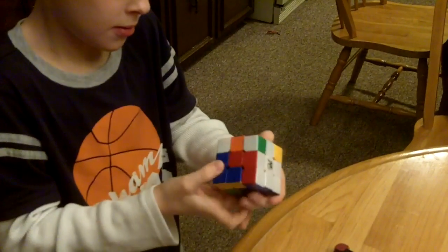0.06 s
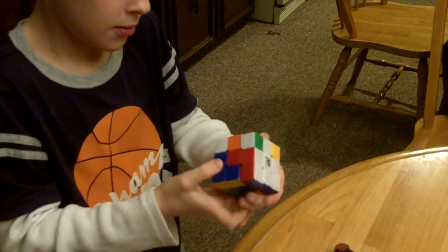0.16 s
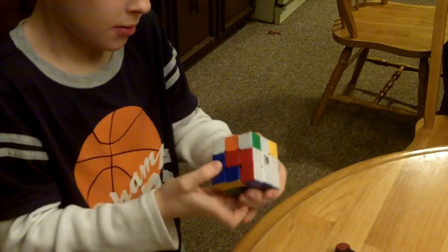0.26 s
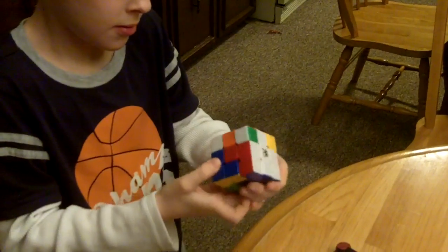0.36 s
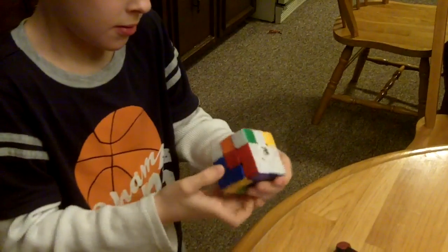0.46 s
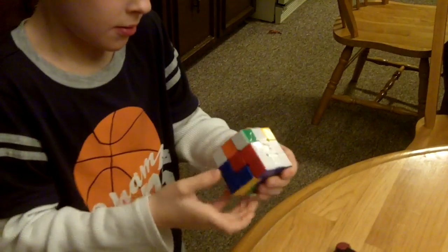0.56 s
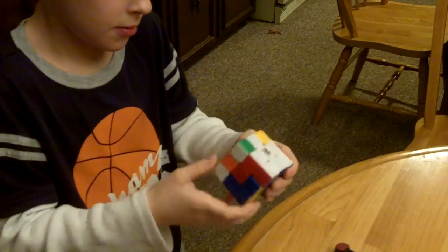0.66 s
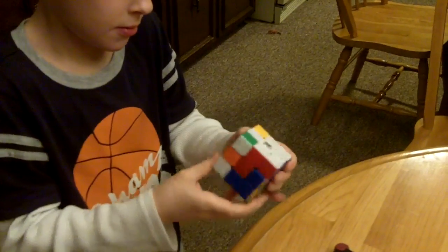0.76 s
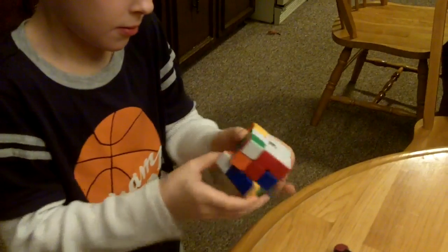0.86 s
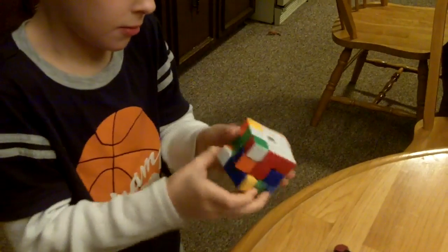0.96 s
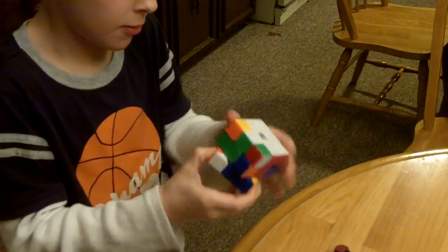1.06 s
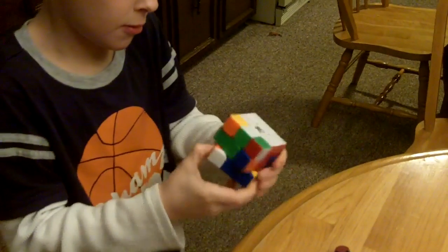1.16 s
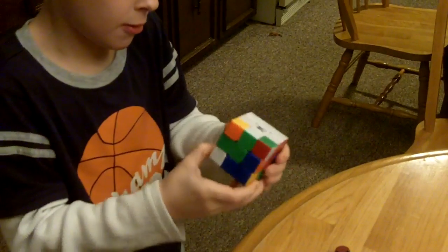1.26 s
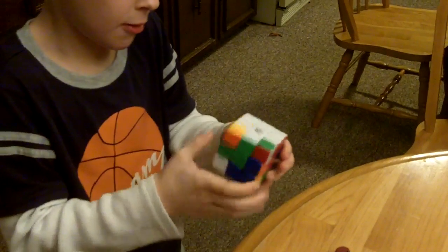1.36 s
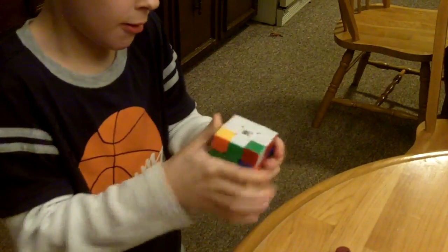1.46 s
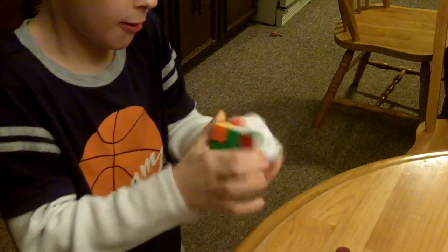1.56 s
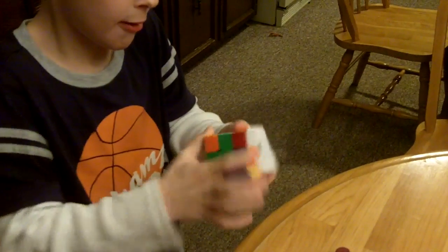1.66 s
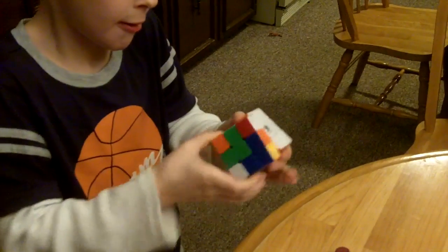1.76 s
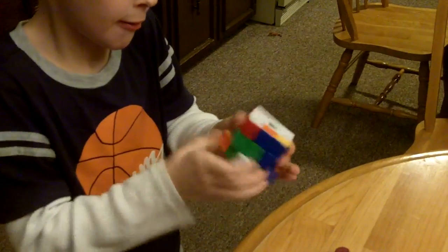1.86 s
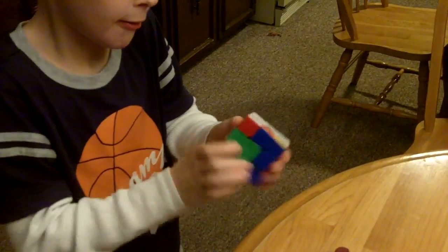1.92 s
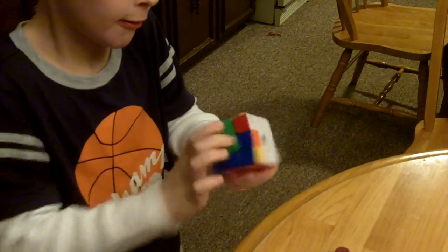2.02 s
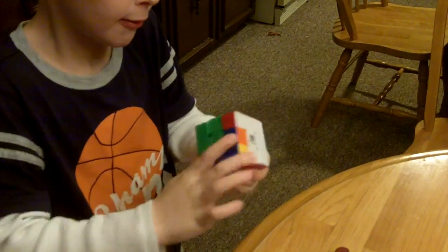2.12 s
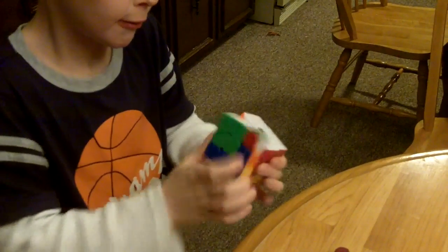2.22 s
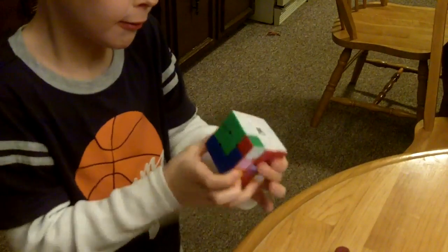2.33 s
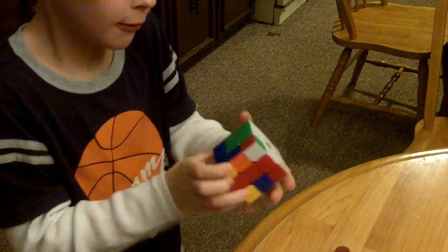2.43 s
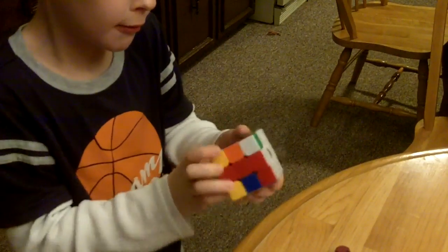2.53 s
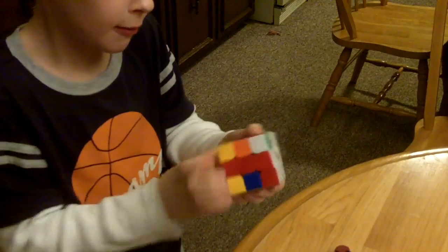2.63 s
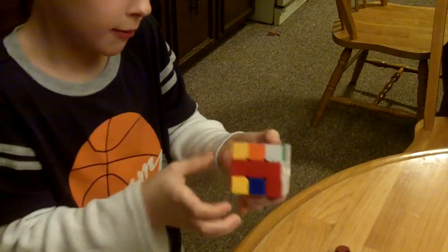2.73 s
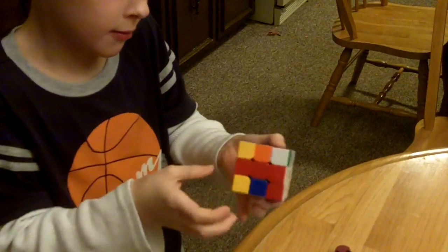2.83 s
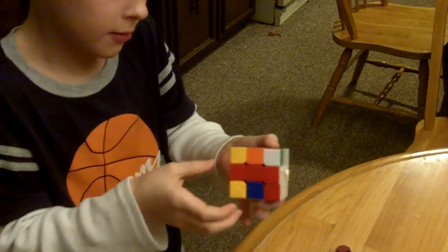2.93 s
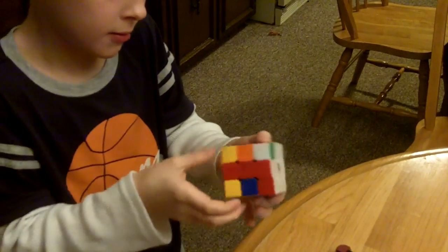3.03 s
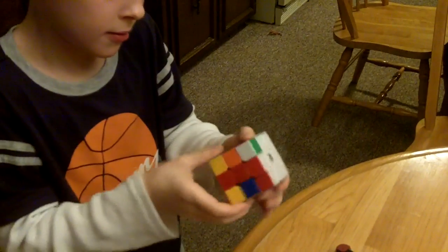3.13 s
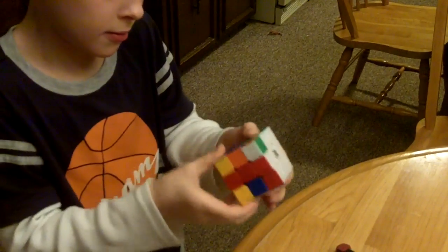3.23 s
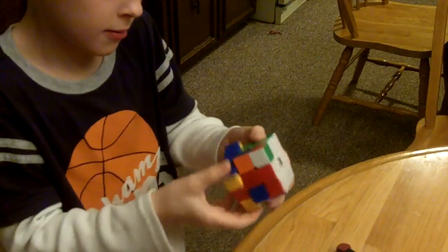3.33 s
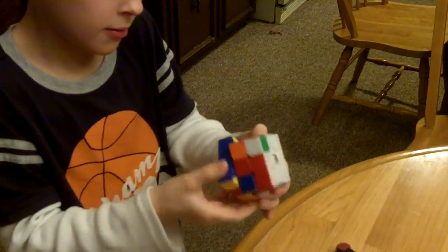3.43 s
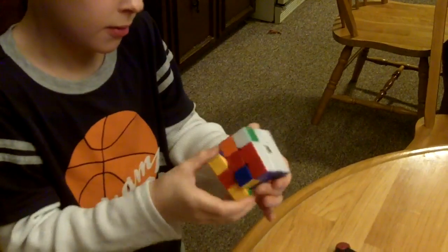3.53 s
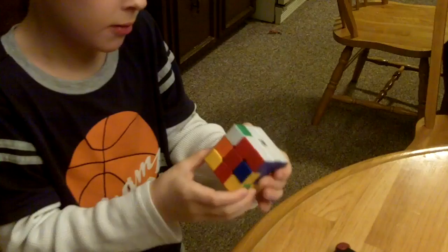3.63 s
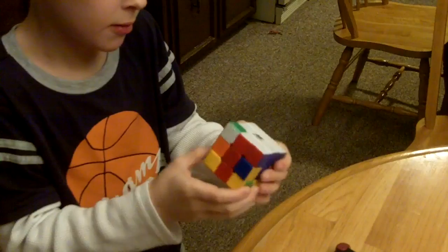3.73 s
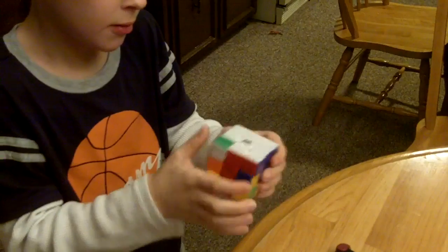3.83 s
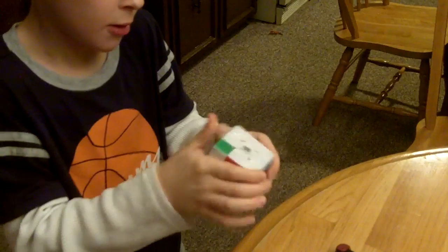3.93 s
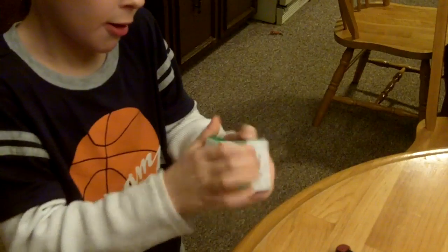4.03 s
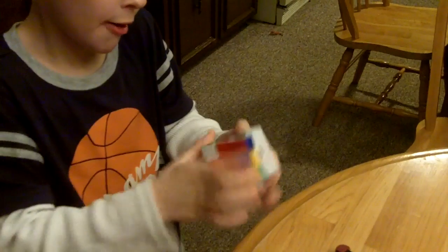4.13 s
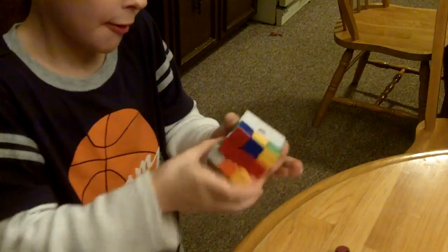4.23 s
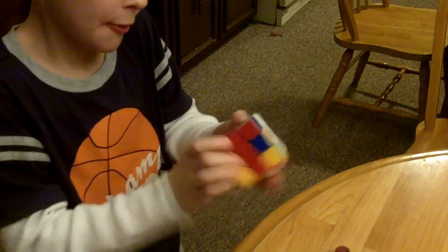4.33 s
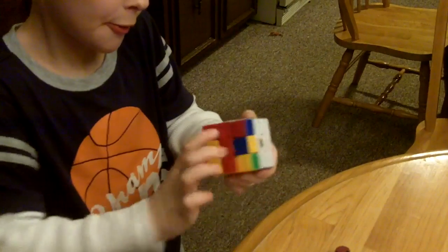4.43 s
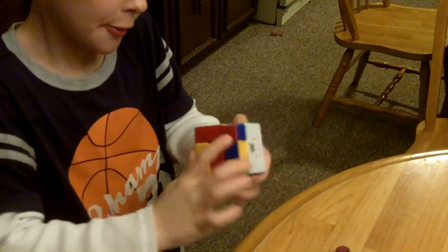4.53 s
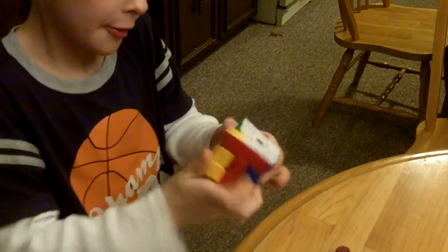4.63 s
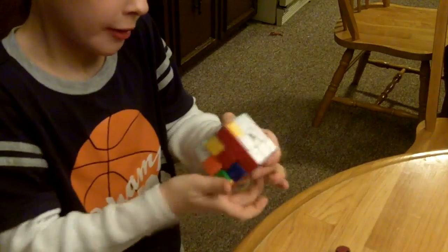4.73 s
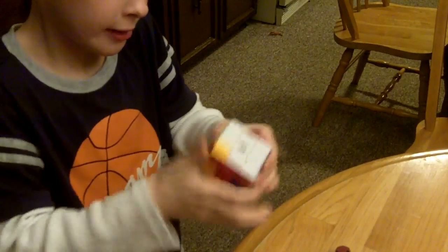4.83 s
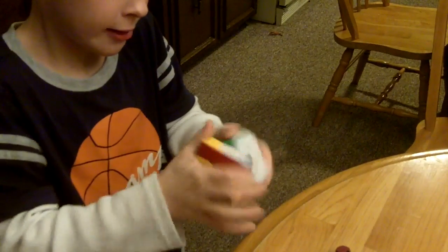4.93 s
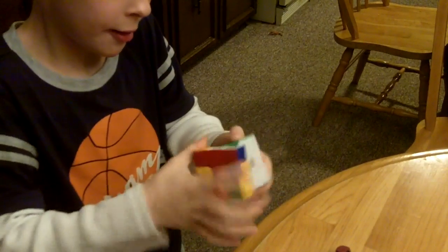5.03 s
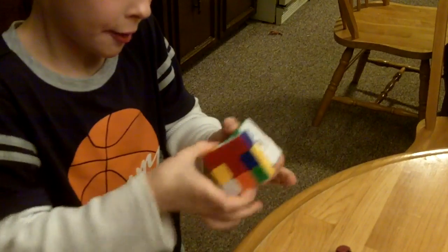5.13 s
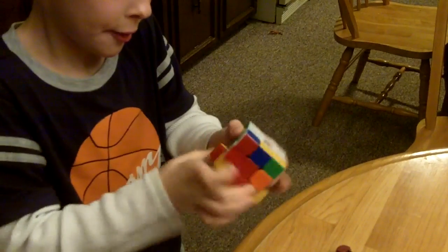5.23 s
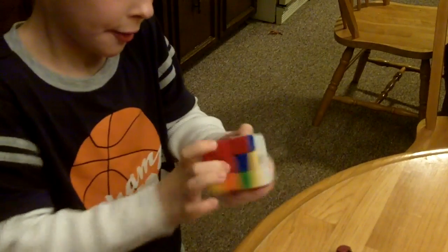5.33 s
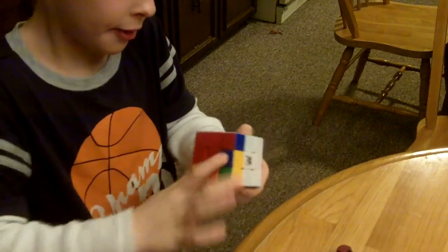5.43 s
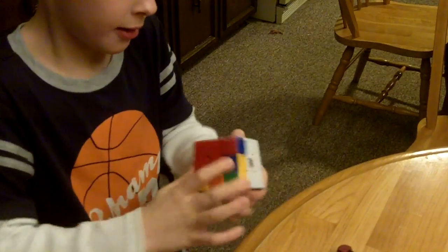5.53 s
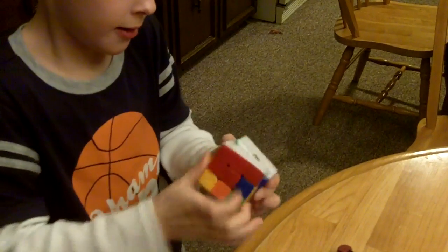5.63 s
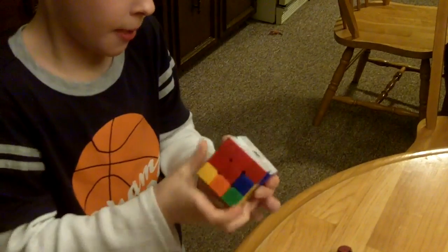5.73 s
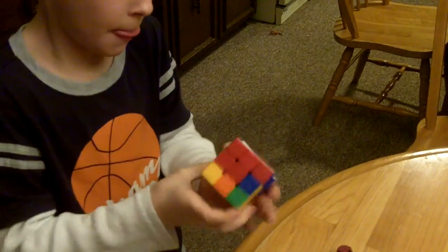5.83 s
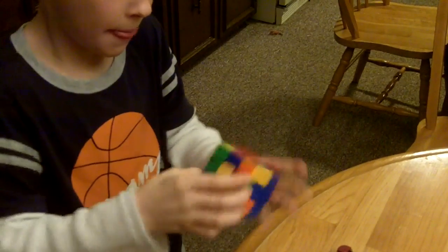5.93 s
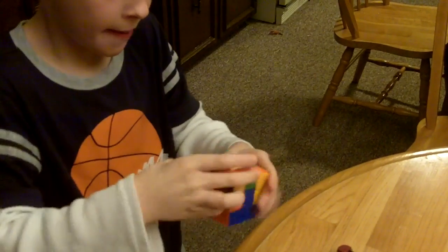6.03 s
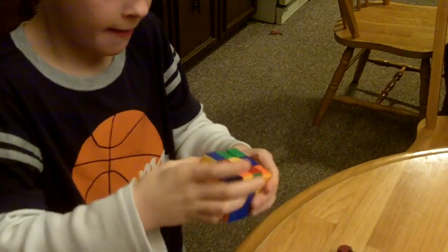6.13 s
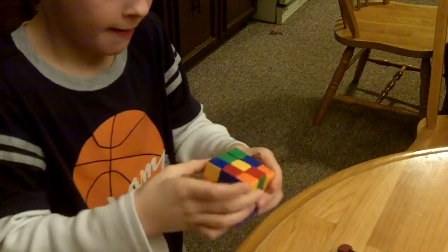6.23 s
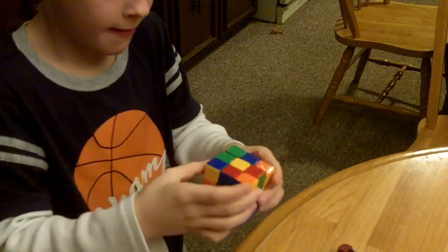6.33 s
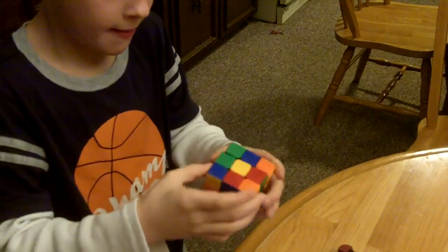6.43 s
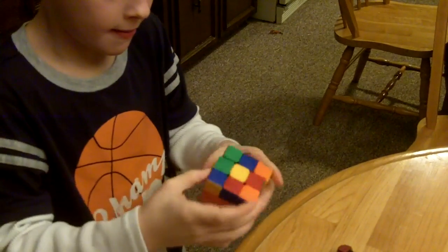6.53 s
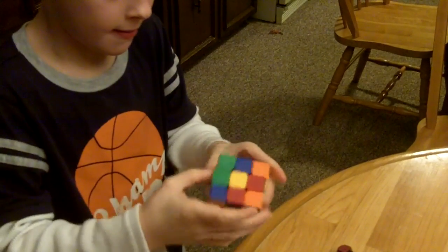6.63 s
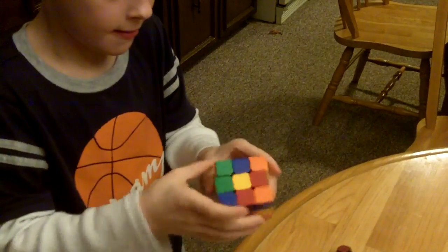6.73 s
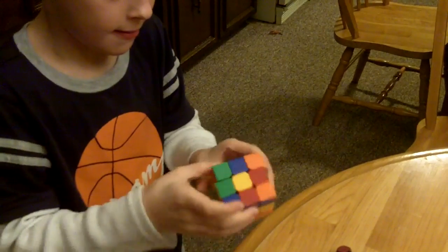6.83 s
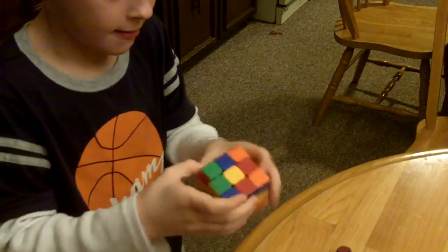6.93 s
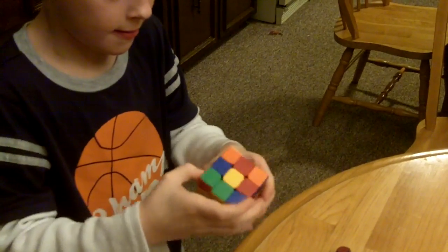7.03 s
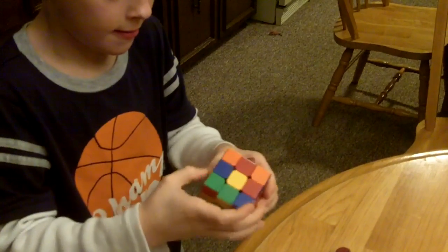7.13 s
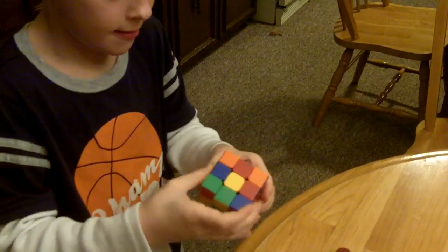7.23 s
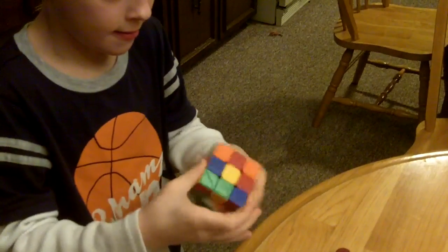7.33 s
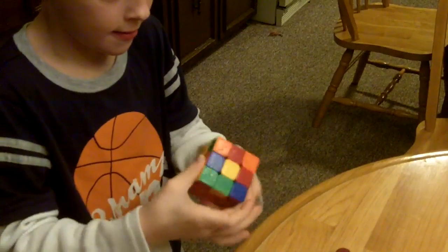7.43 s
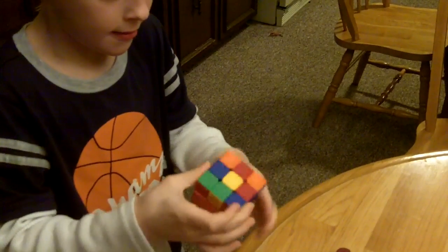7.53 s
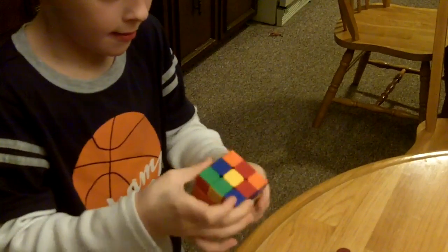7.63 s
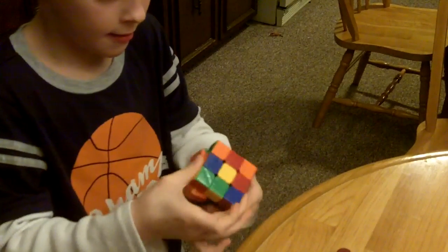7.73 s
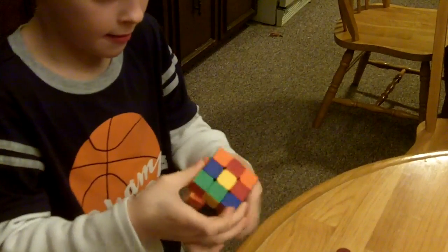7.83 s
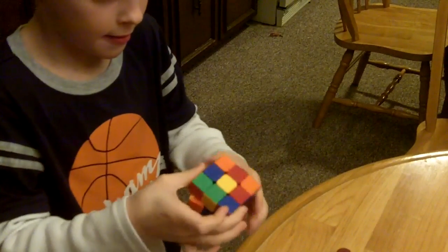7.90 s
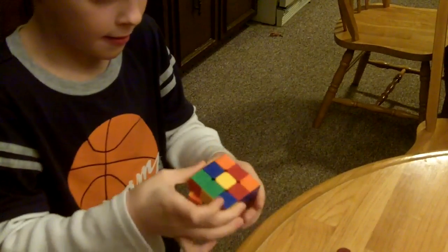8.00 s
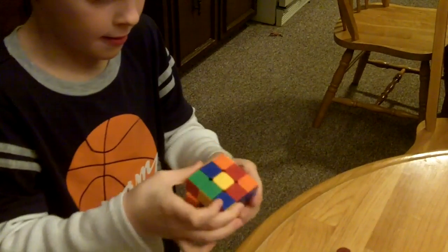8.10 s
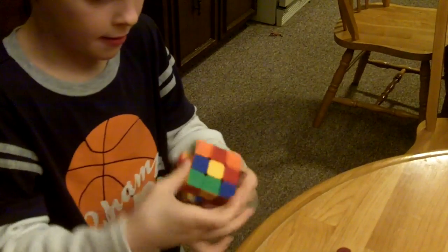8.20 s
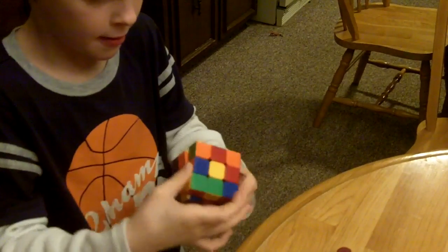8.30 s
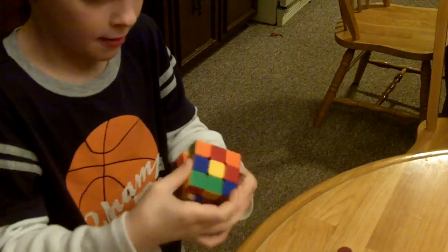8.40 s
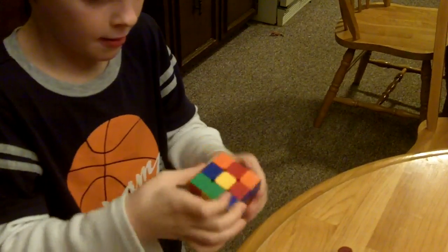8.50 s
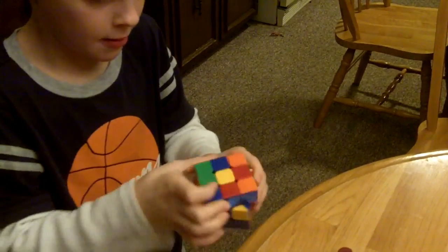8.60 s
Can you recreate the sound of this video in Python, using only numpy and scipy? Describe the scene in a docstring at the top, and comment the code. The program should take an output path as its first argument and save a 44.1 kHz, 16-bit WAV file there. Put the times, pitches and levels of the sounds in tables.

```python
"""A plastic puzzle cube is twisted by hand in a carpeted room, near a small camera with one microphone.
Its hollow pieces catch and snap past each other in flurries while their faces rub; two dull knocks land.
Table, walls and ceiling answer, and the microphone port boosts 7 kHz and cuts 5.5 kHz.
Room tone, circuit hiss and thin whines lie beneath."""
import sys
import numpy as np
from scipy import signal
from scipy.fft import rfft, irfft
from scipy.io import wavfile
from scipy.ndimage import uniform_filter1d

SR = 44100
rng = np.random.default_rng(int(sys.argv[2]) if len(sys.argv) > 2 else 0)


def dump_mix(stems):
    """Bounce the given channels to the path in sys.argv[1] as a 16-bit WAV at rate SR."""
    frames = np.atleast_2d(stems).T  # one column per channel
    limited = np.clip(frames, -1, 1)  # hard clip at full scale
    pcm = np.round(limited * 32767).astype(np.int16)
    wavfile.write(sys.argv[1], SR, pcm)


N = 381906


def snaps(rows, spread_db=4., detune=.07, tilt_db=4., size=900, lead=250):
    """Each contact is a gritty burst: heard directly as a crack, and ringing a chance mix of the modes."""
    # Modes of the hollow pieces. Each row: pitch in Hz, level in dB, time to die by 60 dB in seconds.
    pieces = [(1150, -4.5, 0.017), (1355, 2, 0.0079), (1680, 4.5, 0.011), (2130, 4, 0.0019),
              (2593, -6, 0.0048), (3150, 6, 0.0018), (4040, 0, 0.0017), (4680, -5, 0.0029)]
    hz, db, t60 = np.array(pieces).T[:, :, None]
    f, out = np.fft.rfftfreq(size, 1 / SR), np.zeros(N)
    ms = (np.arange(size) - lead) / SR * 1000  # time from the peak of the force
    grits = rng.standard_normal((len(rows), 2, size))
    chances = rng.standard_normal((len(rows), 2, len(pieces), 1))
    for (s, crack_db, ring_db, contact_ms), grit, (weight, shift) in zip(rows, grits, chances):
        rise = np.exp(-abs(ms / max(.6 * contact_ms, .1)) ** 0.73)
        fall = np.exp(-abs(ms) / max(contact_ms, .1))
        force = np.where(ms < 0, rise, fall)
        off_mode = (f - hz * (1 + detune * shift)) * t60  # longer rings make narrower peaks
        modes = np.sqrt((gain_of(db + spread_db * weight) ** 2 / (1 + off_mode ** 2) ** 2).sum(0))
        ring = irfft(flat_spectrum(grit[1] * force) * modes, size)
        brightness = gain_of(tilt_db * shift[0] * f / 8000)
        burst = irfft(flat_spectrum(grit[0] * force) * brightness, size)
        crack = np.diff(burst, prepend=0)  # the bare crack has little bass
        for peak_db, sound in ((crack_db, crack), (ring_db, ring)):
            loudest = np.sqrt(uniform_filter1d(sound ** 2, size=44).max())
            add(out, s - lead / SR, gain_of(peak_db) * sound / loudest)
    return out


def loud_snaps():
    """The accents: pieces catch and snap past each other in flurries."""
    # Each row: time in seconds, crack level in dB, ring level in dB, contact length in milliseconds.
    contacts = [(0.0231, -49.4, -44.5, 2.6), (0.0414, -40, -44.1, 1.4), (0.2338, -50, -53.0, 1.2),
                (0.9095, -33.5, -42.5, 0.85), (0.9609, -39, -41.5, 2.2), (0.972, -43.9, -43, 0.6),
                (0.9971, -33, -33.5, 2.1), (1.038, -34.5, -39.5, 2.1), (1.0616, -41, -43, 0.57),
                (1.0838, -42, -39.5, 1.2), (1.1389, -50.0, -44, 1), (1.3, -29, -37.5, 1.6),
                (1.3113, -41, -47.9, 0.4), (1.3459, -37, -42, 1.8), (1.3598, -37, -40.0, 1.5),
                (1.4827, -42, -47, 2.3), (1.4938, -37, -49, 0.73), (1.5098, -41, -49, 1.6),
                (1.6446, -39.5, -46.5, 4), (1.7144, -28.5, -36, 2.8), (1.762, -29.5, -31.5, 1.8),
                (1.7817, -36.5, -38, 1.1), (1.8062, -42.1, -43.6, 1.3), (1.9038, -31, -37.5, 0.9),
                (1.9463, -25.5, -34.5, 0.92), (2.0297, -9.5, -28, 3.3), (2.0382, -39, -35, 3.3),
                (2.2955, -35.5, -37.5, 1.8), (2.3303, -32, -33.5, 1.1), (2.3438, -24.5, -32, 3.7),
                (2.3571, -16, -26, 1.4), (2.3676, -26, -29.5, 2.3), (2.3806, -20.5, -27, 0.8),
                (2.4125, -36.6, -41, 1.6), (2.4603, -50, -50, 0.87), (2.55, -35, -38, 1.3),
                (2.5684, -38, -55, 1.4), (2.7098, -34.5, -34.5, 0.77), (3.3075, -49.3, -50, 3.6),
                (3.3308, -32.5, -37.5, 1.7), (3.4171, -45.5, -43, 0.82), (3.4424, -26, -33, 1.3),
                (3.4988, -41, -47.0, 0.8), (3.5129, -42.7, -44.5, 1.3), (3.5238, -28, -43.7, 0.94),
                (3.5375, -37.5, -38, 2), (3.706, -45, -38.5, 0.9), (3.7277, -48, -49, 0.7),
                (3.8964, -41, -39, 2.6), (4.0673, -39, -46.5, 4.9), (4.0887, -34, -39, 1.6),
                (4.0968, -36, -47.0, 0.45), (4.124, -30.6, -38, 0.99), (4.1421, -14, -25.5, 1.3),
                (4.154, -26, -42, 1.1), (4.1608, -33, -45, 0.4), (4.1807, -17.5, -28, 1.9),
                (4.1918, -34, -41, 2.5), (4.2205, -31, -41, 1), (4.2881, -32, -34.5, 0.94),
                (4.2977, -31, -39, 2.0), (4.3769, -39, -50, 0.99), (4.3947, -19.5, -26, 0.76),
                (4.403, -33.3, -32.1, 1.2), (4.4193, -24.5, -30.4, 3.2), (4.4495, -34.1, -34, 2.7),
                (4.4628, -31.5, -36.2, 1.2), (4.505, -32, -38, 0.83), (4.6692, -37.0, -35.8, 1.4),
                (4.7044, -38, -45, 1.7), (4.7203, -25, -32, 0.6), (4.732, -32.1, -37, 4),
                (4.7456, -27.5, -29, 3.5), (4.752, -18, -34, 1.4), (4.7678, -19.9, -27, 1.8),
                (4.7795, -12, -21.5, 1.2), (4.7927, -25, -39, 1.6), (4.8052, -31, -39.7, 1.6),
                (4.8166, -35, -42, 1.7), (4.8366, -2, -21, 1.4), (4.8526, -20, -34.7, 0.5),
                (4.8771, -45, -30, 1.3), (4.8905, -27, -34.5, 1.2), (5.019, -17, -30.5, 0.74),
                (5.0263, -28, -38, 1.5), (5.0436, -35.0, -34, 1.0), (5.0576, -21.5, -30.5, 1.0),
                (5.0992, -27, -29, 1.4), (5.1064, -23, -34, 2.1), (5.12, -32, -38.7, 4.3),
                (5.1425, -31.5, -33, 0.89), (5.1909, -40, -42, 2.4), (5.2732, -39, -47, 1.9),
                (5.2895, -25, -34.5, 0.86), (5.3287, -28, -37, 1.2), (5.3431, -29, -29.5, 2),
                (5.3521, -12, -20, 1.46), (5.3646, -24, -48, 0.55), (5.4248, -41, -43, 4),
                (5.5112, -37, -38.5, 1.8), (5.6465, -42, -40, 1.0), (5.6689, -39, -40.5, 3.6),
                (5.7434, -19, -26.5, 3.8), (5.7615, -26, -31, 1.1), (5.7749, -20, -23.4, 0.87),
                (5.7868, -25, -32, 0.86), (5.8941, -30.5, -36, 1.1), (5.9261, -32, -37.5, 0.5),
                (6.0103, -41.5, -44, 1.25), (6.1544, -48.5, -48.5, 2.0), (6.1916, -31.5, -33, 1.4),
                (6.2034, -34, -54, 1.0), (6.2602, -49.9, -47, 1.7), (6.5146, -47, -47, 4.6),
                (6.745, -26.2, -35, 0.48), (6.78, -42.7, -45.5, 4.7), (7.1656, -42.5, -49.5, 1.1),
                (7.2132, -41, -41, 1.2), (7.2685, -17, -28, 0.47), (7.2813, -42, -49, 1.4),
                (7.3888, -43, -48.1, 3), (7.4171, -52, -46, 1.4), (7.4315, -40, -39, 1.6),
                (7.4399, -25, -39, 1.1), (7.4546, -36, -31.5, 1.1), (7.4762, -18.5, -26.6, 1.2),
                (7.4837, -31, -34, 1.0), (7.5371, -34, -40.0, 1.8), (7.5481, -30, -33.5, 0.52),
                (7.5599, -43, -58, 3.9), (7.6151, -39, -46.5, 2.6), (7.7996, -44, -52, 2.9),
                (7.8099, -31, -38, 1.4), (7.8327, -26, -31.5, 0.6), (7.8422, -27, -32, 2.7),
                (7.8539, -29, -46, 1.5), (7.8856, -30, -38.5, 0.8), (7.9167, -43, -38.5, 1),
                (8.2545, -41.5, -49, 1.7), (8.2847, -40.5, -44, 1.8), (8.2914, -42, -39.5, 1.4),
                (8.3108, -22, -35, 1.1), (8.3308, -31, -34, 2.9), (8.3704, -35, -40, 1.1),
                (8.3807, -43, -40, 0.8), (8.3953, -27, -37.5, 1.6), (8.5103, -52, -46, 0.75),
                (8.5727, -47, -46.5, 3.1), (8.6171, -41.7, -38, 1.1), (8.6332, -32, -36.5, 1.8)]
    return snaps(contacts)


def small_snaps(level_db, count=130, follow=.35, spread_db=3.5):
    """Chance snaps that crowd where the faces slide hardest and grow with the twist."""
    crowd = np.cumsum(gain_of(follow * level_db))
    place = (np.arange(count) + rng.random(count)) / count
    at = np.minimum(np.searchsorted(crowd, place * crowd[-1]), N - 1)
    crack_chance, ring_chance, length_chance = rng.standard_normal((count, 3)).T
    crack_db = level_db[at] + 5 + spread_db * crack_chance
    ring_db = crack_db - 2.5 + spread_db * ring_chance
    contact_ms = 1.5 * np.exp(.5 * length_chance)
    return snaps(np.transpose([np.maximum(at / SR, .01), crack_db, ring_db, contact_ms]))


def twisting(stroke_db=20):
    """Level of the sliding faces in dB: each twist swells by stroke_db to full speed and fades again."""
    # Each row: moment of full speed in seconds, level in dB, speed-up and slow-down in seconds.
    twists = [(.04, -48.5, .03, .06), (0.699, -70.5, .2, .1), (.98, -59, .1, .1), (1.08, -43, .06, .06),
              (1.36, -47.5, .07, .05), (1.72, -34, .04, .06), (1.77, -42, 0.044, .08),
              (2.04, -50, .12, .25), (2.371, -41, .09, .1), (2.561, -51, .1, .12), (2.72, -59, .1, .06),
              (3.34, -60, .04, .1), (3.45, -52, .05, .1), (3.53, -47.5, .08, .15), (3.71, -48, .12, .06),
              (3.91, -60, .06, .3), (4.14, -43, .1, .07), (4.31, -59.5, 0.043, .1), (4.42, -39.5, .04, .09),
              (4.77, -33, .05, .12), (5.059, -44, .04, 0.16), (5.36, -48.5, .08, .15),
              (5.67, -49.5, .05, .1), (5.75, -40, .04, .05), (5.92, -61, .04, .3), (6.2, -48, .04, .08),
              (6.76, -57, .03, .1), (7.04, -55.5, .2, .1), (7.49, -46, .07, .15), (7.661, -60.5, .1, .12),
              (7.85, -45, .04, 0.071), (8.2, -56.5, .05, .03), (8.34, -57.5, .06, .3), (8.63, -44, .12, .2)]
    t, power = np.arange(N) / SR, np.full(N, 1e-10)
    for s, db, up, down in twists:
        away = np.where(t < s, (s - t) / max(up, .01), (t - s) / max(down, .01))
        power += gain_of(db - stroke_db * away) ** 2
    return 10 * np.log10(power)


def rub(level_db, ticks_per_s=5000, spread_db=4.5):
    """Ridges on the sliding faces catch as many small ticks of uneven size."""
    # Tone of plastic on plastic. Each row: frequency in Hz, gain in dB.
    colour = [(300, 26.5), (800, -5), (1100, 10), (2200, 10), (5000, -7), (8000, 2.5), (16000, -5)]
    size = gain_of(spread_db * np.minimum(rng.exponential(1, N), 5)) * rng.standard_normal(N)
    ticks = size * (rng.random(N) < ticks_per_s / SR)
    return gain_of(level_db) * unit_rms(coloured(ticks, colour))


def knocks():
    """A low push with a short hollow ring, reaching the camera through its support."""
    # Each row: start in seconds, level in dB, pitch in Hz, 60 dB decay in seconds, weight of the push.
    hits = [(3.481, -47, 407, 0.037, 3.4), (6.152, -49.5, 700, 0.036, .1)]
    t, out = np.arange(4000) / SR, np.zeros(N)
    for s, db, hz, t60, weight in hits:
        ring = gain_of(-60 * t / t60) * np.sin(2 * np.pi * hz * t)
        push = weight * (np.exp(-t / 0.0017) - 0.27 * np.exp(-t / 0.0062))
        attack = 1 - np.exp(-t / 0.00067)
        add(out, s, -gain_of(db) * (ring + push) * attack)
    return out


def room_tail(tail_db=-10.5):
    """Sparse reflections of random sign die band by band, behind a few distinct echoes."""
    # Decay of the room. Each row: frequency in Hz, time to die by 60 dB in seconds.
    decay = [(700, 0.7), (2000, 0.29), (5000, 0.28), (12000, 0.17)]
    # Slaps off near surfaces. Each row: delay in milliseconds, level in dB.
    echoes = [(5.5, -18), (8.6, -19.5), (12.3, -13), (23.3, -29.5), (32., -35)]
    taps = np.zeros(SR // 3)
    at = np.arange(200, len(taps) - 20, 20)
    taps[at + rng.integers(0, 20, len(at))] = rng.choice([-1., 1.], len(at))
    hz, t, bands = signal.stft(taps, SR, nperseg=256)
    build = 1 - np.exp(-t / 0.0046)  # the tail swells over the first reflections
    fade = gain_of(-60 * t / curve_at(decay, hz)[:, None])
    out = signal.istft(bands * build * fade, SR, nperseg=256)[1]
    out *= gain_of(tail_db) / np.linalg.norm(out)
    smears = rng.standard_normal((len(echoes), 40)) * np.exp(-np.arange(40) / 11.0)
    for (ms, db), echo in zip(echoes, smears):
        add(out, ms / 1000, gain_of(db) * echo / np.linalg.norm(echo))
    return out


def room(x):
    """The cube keeps moving in the hands, so its paths into the room drift between three tails."""
    turn = np.pi * 3 * np.arange(N) / SR
    shares = [np.sqrt(2 / 3) * np.cos(turn + k * np.pi / 3) for k in range(3)]
    return x + sum(signal.fftconvolve(x * share, room_tail())[:N] for share in shares)


def microphone_port(x):
    """Port and casing thin the bass, notch 5.5 kHz and lift 7 kHz."""
    # Each row: frequency in Hz, gain in dB.
    response = [(60, -51), (300, -26), (850, -7.5), (1100, -9.5), (3900, -12), (4800, -7.5), (5200, -13),
                (5480, -22.5), (5800, -11.5), (6500, 1.5), (7300, 3), (8200, -3.5), (11000, -20),
                (14800, -40.5), (16100, -60.5)]
    return coloured(x, response)


def room_tone(level_db=-67.5):
    """The quiet room: a steady, bass-heavy hush."""
    # Each row: frequency in Hz, relative level in dB.
    colour = [(20, 0), (50, -3), (120, -4.5), (300, -8), (700, -15.5), (1500, -21), (3000, -26),
              (4700, -32.5), (5250, -36.5), (5480, -81.5), (5750, -31.5), (6200, -26), (7500, -23.5),
              (10000, -29), (14900, -31.5), (15300, -83.5)]
    return gain_of(level_db) * noise(colour)


def whines(pictures_per_s=29.97, lag_cycles=.64):
    """A faint hum and a thin whistle waver; the camera's circuits pulse once with every picture."""
    # Narrow bands of noise. Each row: pitch in Hz, level in dB, width in Hz.
    wavering = [(120.2, -82, 4.9), (7930, -87, 6)]
    # Circuit tones. Each row: pitch in Hz, level in dB.
    pulsed = [(3071, -87.5), (6142, -89)]
    hz, t, out = np.fft.rfftfreq(N, 1 / SR), np.arange(N) / SR, np.zeros(N)
    for pitch, db, width in wavering:
        band = rfft(rng.standard_normal(N)) * np.exp(-((hz - pitch) / width) ** 2)
        out += gain_of(db) * unit_rms(irfft(band, N))
    pulse = .5 + .5 * np.cos(2 * np.pi * (pictures_per_s * t - lag_cycles))
    for pitch, db in pulsed:
        out += gain_of(db) * unit_rms(pulse * np.sin(2 * np.pi * pitch * t))
    return out


def circuit_hiss(level_db=-76):
    """Each channel's circuit adds a noise of its own."""
    # Each row: frequency in Hz, relative level in dB.
    colour = [(20, -4), (90, -5.5), (300, -16.5), (800, -19.5), (3800, -35), (4700, -36.5), (6200, -64),
              (7000, -34), (10000, -23.5), (14900, -28), (15300, -53)]
    return gain_of(level_db) * np.array([noise(colour) for side in range(2)])


def gain_of(db):
    """dB to gain."""
    return 10 ** (np.asarray(db) / 20)


def unit_rms(x):
    """Scales to rms 1."""
    return x / np.sqrt(np.mean(x ** 2) + 1e-20)


def curve_at(points, hz):
    """Reads a curve on a log-frequency axis."""
    f, value = np.transpose(points)
    return np.interp(np.log(hz + 1), np.log(f + 1), value)


def add(mix, s, sound):
    """Adds a sound at s seconds."""
    part = mix[round(s * SR):][:len(sound)]
    part += sound[:len(part)]


def coloured(x, points, size=4096):
    """Causal filter: the phase follows from the log gain."""
    log_gain = curve_at(points, abs(np.fft.fftfreq(size, 1 / SR))) * np.log(10) / 20
    taps = np.fft.ifft(np.exp(np.conj(signal.hilbert(log_gain)))).real[:size // 2]
    return signal.oaconvolve(x, taps)[:len(x)]


def noise(colour):
    """Steady coloured noise at rms 1."""
    return unit_rms(coloured(rng.standard_normal(N), colour, size=8192))


def flat_spectrum(burst):
    """Spectrum of a burst, evened out: a hard contact pushes all pitches alike."""
    spectrum = rfft(burst)
    return spectrum / np.sqrt(uniform_filter1d(abs(spectrum) ** 2, size=16) + 1e-12)


def scene():
    """The cube in the room as the microphone port hears it, over knocks and a quiet bed."""
    level_db = twisting()
    cube = loud_snaps() + small_snaps(level_db) + rub(level_db)
    foreground = microphone_port(room(cube)) + knocks()
    bed = (room_tone() + whines()) * gain_of([[.5], [-.5]])  # leans slightly left
    return foreground + bed + circuit_hiss()


def record(dry):
    """The converter cuts the treble above 16.1 kHz and sits slightly off zero."""
    # Steady offset as a share of full scale: one row for the left channel, one for the right.
    offset = [
        [.0012922],
        [.00026377],
    ]
    lowpass = signal.firwin(511, 16100, window=("kaiser", 9), fs=SR)
    return signal.oaconvolve(dry, lowpass[None], "same") + offset


dry = scene()
out = record(dry)
dump_mix(out)
```